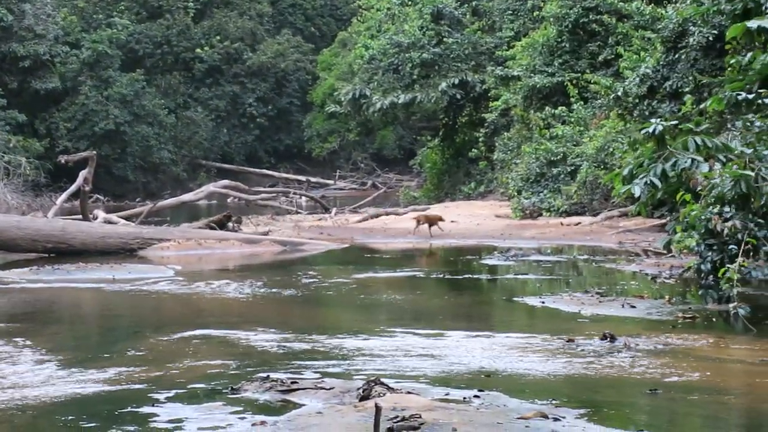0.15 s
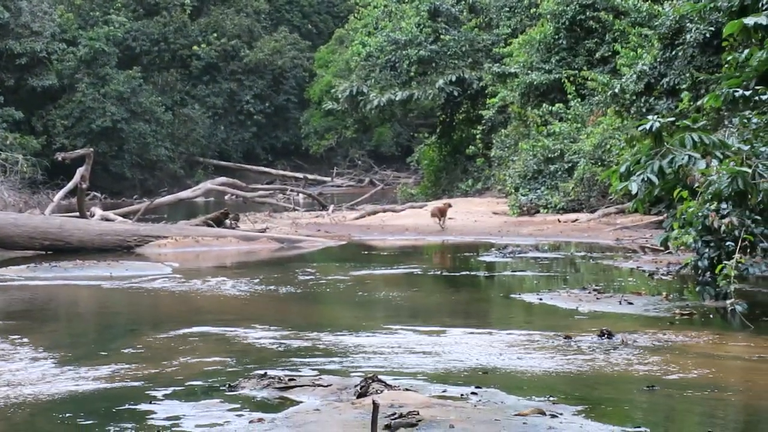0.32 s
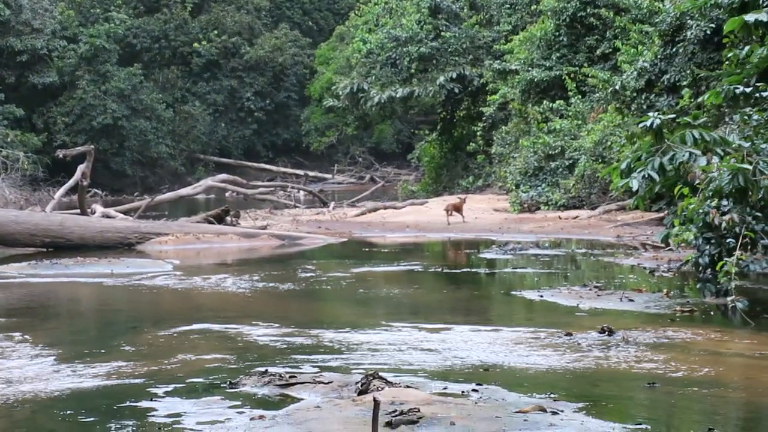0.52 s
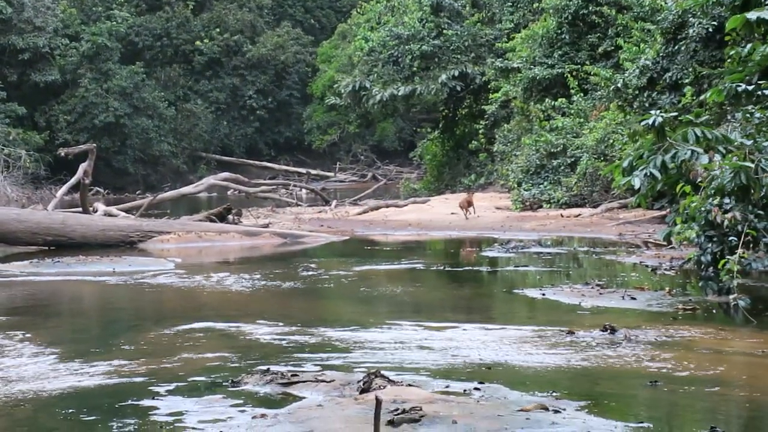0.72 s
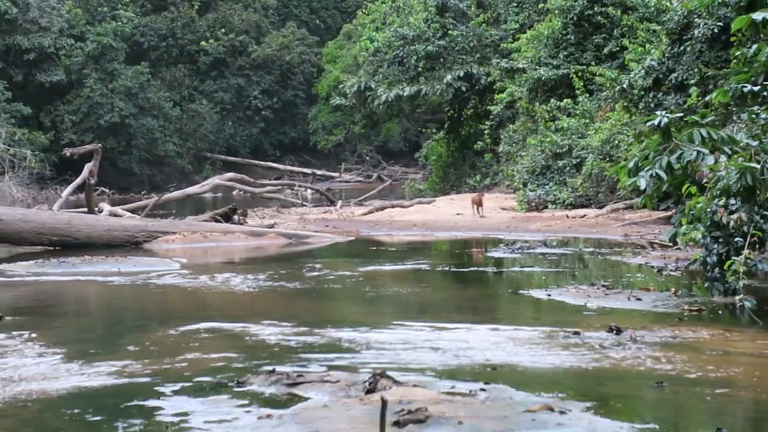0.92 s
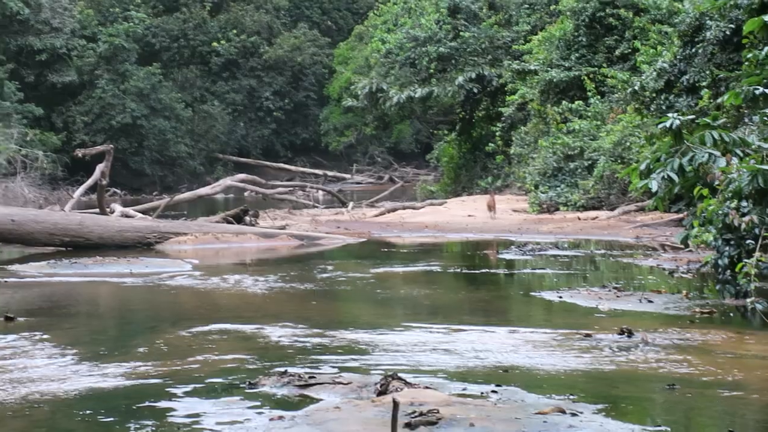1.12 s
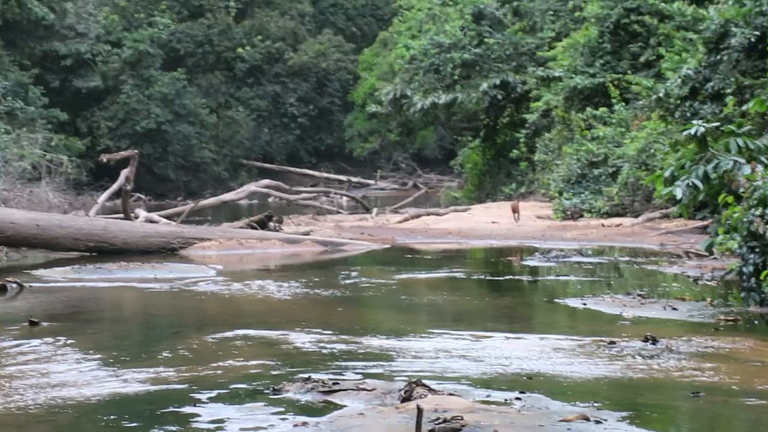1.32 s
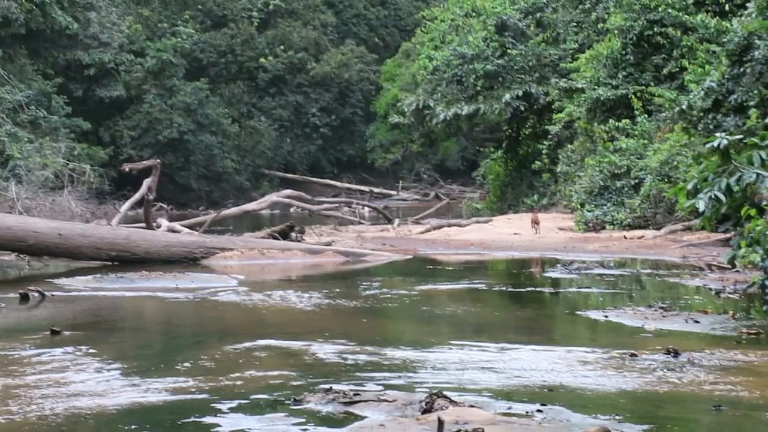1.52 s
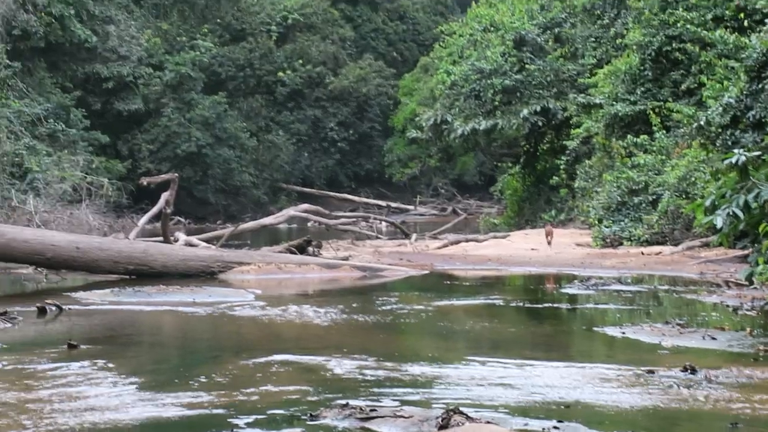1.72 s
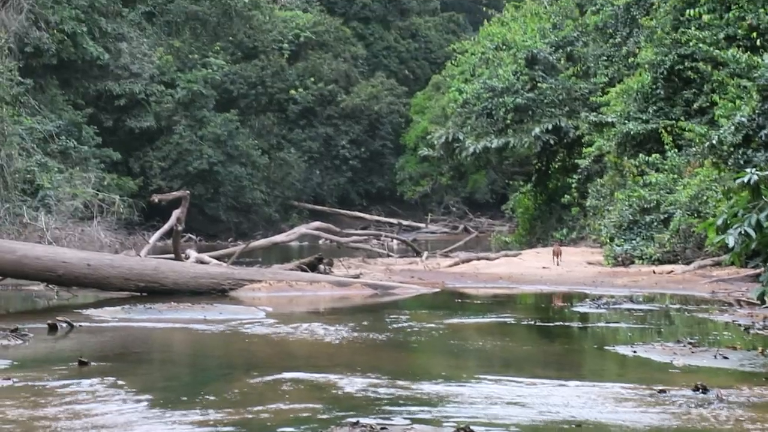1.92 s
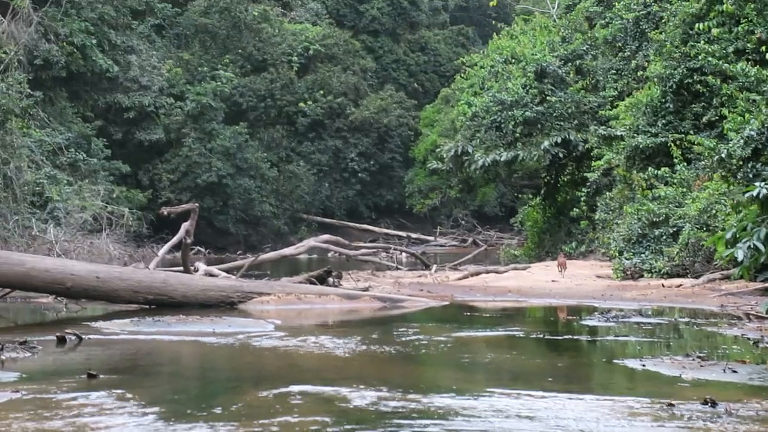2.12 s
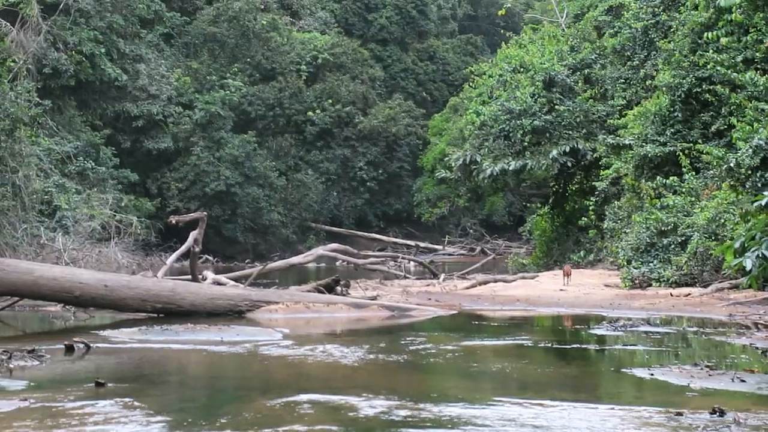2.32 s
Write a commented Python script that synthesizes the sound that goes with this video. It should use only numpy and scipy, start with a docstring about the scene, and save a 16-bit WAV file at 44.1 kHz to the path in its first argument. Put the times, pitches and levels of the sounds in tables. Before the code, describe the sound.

Shrill insect chorus above soft river murmur, with handling rub, small ticks and a loud microphone bump

```python
"""Insect choruses drone in narrow treble bands over the murmur of a quiet forest river, heard in stereo.
The insects are wandering tones; the water and the forest hiss are shaped noise, with bubbles and low hums.
Close by, two bubbles plop as rising tones, a hand rubs the casing as lumpy noise, and the casing's modes tick.
One sharp tap on the microphone, a sum of damped swings, overloads the input; the gain control
ducks the scene at once and lets it swell back."""
import sys
import numpy as np
from scipy import signal
from scipy.fft import rfft, irfft, next_fast_len
from scipy.io import wavfile
from scipy.ndimage import uniform_filter1d, map_coordinates

SR = 44100
rng = np.random.default_rng(int(sys.argv[2]) if len(sys.argv) > 2 else 0)


def int16_out(signal):
    """Quantize to a 16-bit WAV file."""
    q = np.round(np.clip(np.atleast_2d(signal).T, -1, 1) * 32767)
    wavfile.write(sys.argv[1], SR, q.astype(np.int16))


N = 105840
T = np.arange(N) / SR  # time [s]

# Insect choruses. Each row: centre in Hz, nominal width in Hz, level in dB, left-right likeness (-1 to 1),
# left over right in dB, flutter depth in dB per unit of wobble.
CHORUSES = [(7637, 670, -48.5, -0.19, 2, -1.5), (8990, 190, -60.5, -0.27, 1, -1),
            (6305, 290, -61, -0.083, 0.5, 1.5), (5830, 120, -70.5, -0.03, 0.5, 2),
            (5100, 40, -73.5, 0.2, 2.5, 3), (4455, 200, -72, 0.2, 1.5, 2.5),
            (2762, 110, -71.5, 0.032, 2.5, 1.5)]
# Swell of the first, loudest chorus. Each row: time in seconds, gain in dB.
CHORUS_SWELL = [(0, 3), (.4, 0.5), (.7, 1.5), (1.1, 2), (1.5, 1.5), (1.9, 1), (2.2, 1), (2.4, 2.5)]
# Phrases of a nearer insect. Each row: start in seconds, length in seconds, level in dB.
NEAR_PHRASES = [(-.25, 0.277, -40), (0.67, 0.43, -49.5), (1.66, 0.37, -51.5)]
PHRASE_FROM_HZ, PHRASE_TO_HZ, PHRASE_WIDTH_HZ, PHRASE_FADE_S = 7090, 7330, 90, 0.03

# Colour of the river murmur. Each row: frequency in Hz, relative density in dB per Hz.
RIVER_COLOUR = [(40, -26), (80, -11), (125, -8), (200, -6), (345, -2), (440, -5.5), (530, -2.5),
                (800, -5.5), (1050, -2), (1190, -6.5), (1400, -7), (2500, -13), (5000, -41.5)]
# Slow change of the murmur and its small bubbles. Each row: time in seconds, gain in dB.
RIVER_FLOW = [(0, -0.8), (.6, 0), (1, 0), (1.4, -1.25), (1.8, -4.5), (2.1, 0), (2.4, 0.24)]
# Colour of the forest hiss. Each row: frequency in Hz, relative density in dB per Hz.
AIR_COLOUR = [(300, -21), (1500, -4.5), (3000, -2.5), (5500, -6), (7000, -4), (9200, -4)]
# Stereo image of all the shaped noise. Each row: frequency in Hz, left-right likeness (-1 to 1).
PORT_LIKENESS = [(60, 0.49), (150, 1), (380, 0.93), (950, 0.18), (2380, 0.53), (5980, 0.021), (15000, -0.3)]
RIVER_DB, AIR_DB = -60, -59.5
LEFT_DB = 1  # river and air, left over right
# Small bubbles in the shallows: rate, median starting pitch, base level before each bubble's own size
GURGLE_PER_S, GURGLE_HZ, GURGLE_DB = 400, 494, -81
# Narrow hums in the flow. Each row: centre in Hz, nominal width in Hz, mid level in dB.
RIVER_HUMS = [(126.6, 26, -80.5), (358, 30, -74), (498, 180, -75), (1190, 47, -75)]

# Near bubbles. Each row: start in seconds, starting pitch in Hz, rise in octaves, length in seconds,
# peak level in dB.
NEAR_BUBBLES = [(-.008, 780, 1.55, .044, -52), (.042, 2300, .35, .028, -63)]

# Pressure of the hand on the casing. Each row: time in seconds, mid level in dB.
HAND_LEVEL = [(0, -59), (.08, -54), (.2, -55), (.3, -64), (.4, -56), (.48, -64), (.545, -59), (.57, -72),
              (.6, -95.5)]
# Colour of the rub. Each row: frequency in Hz, relative density in dB per Hz.
RUB_COLOUR = [(20, -7.5), (80, -5), (160, -9), (400, -21), (3000, -23), (14000, -36)]

# Ticks of the casing. Each row: start in seconds, level in dB, rattle length in seconds, top of the crunch in Hz.
CASING_TICKS = [(.124, -58, .004, 2500), (.167, -41.5, .014, 5500), (0.642, -41.5, .019, 3700),
                (.802, -41.5, .02, 3900)]
# Casing modes. Each row: frequency in Hz, relative level in dB, time to fall 60 dB in seconds.
CASING_MODES = [(330, -1, .07), (560, -4, .045), (1000, -3, .035), (1630, -2, .022), (2140, -4, .014),
                (2600, 2, .014), (3400, -5, .01)]
CONTACTS = 40  # in each rattle
CRUNCH_DB, CRUNCH_T60_S = 5, .012  # relative to the modes

# Arrival of the tap. Entries: left port, right port, both in seconds.
TAP_START_S = (.2203155, .2203285)
# Onset time constant of the tap. Entries: left port, right port, both in seconds.
TAP_ONSET_S = (.001919, .00027)
# Swings at the left port. Each row: frequency in Hz, level before onset and decay in dB,
# decay time constant in seconds, direction (1 or -1).
LEFT_SWINGS = [(870.4, 70, .000271, -1), (43.43, 70, .000533, 1), (37.93, 36.97, .002097, -1),
               (11, -1, .0125, 1)]
# Swings at the right port. Each row: frequency in Hz, level before onset and decay in dB,
# decay time constant in seconds, direction (1 or -1).
RIGHT_SWINGS = [(424.4, 35.87, .000546, 1), (279.6, 19.19, .001325, 1), (3, 45.34, .002424, -1),
                (11, .5, .0125, 1)]

SOFT_TOP_HZ = 9400  # top of everything but the tap
DUCK_ABOVE, DUCK_DB, RELEASE_DB_PER_S = .1, 12, 9  # threshold is a peak amplitude
CLIP_HARDNESS = 8
HISS_DB = -101  # electronics, before the output filter
EDGE_HZ, TOP_HZ = 20000, 16400  # gentle rounding, steep top


def amp(db):
    """Decibels to gain."""
    return 10 ** (np.asarray(db) / 20)


def unit(x):
    """Scaled to rms 1."""
    return x / np.sqrt(np.mean(np.abs(x) ** 2) + 1e-20)


def along(points, hz):
    """(Hz, value) points read along a log frequency axis."""
    f, v = np.transpose(points)
    return np.interp(np.log(hz + 1), np.log(f + 1), v)


def curve(rows):
    """(s, value) rows joined by straight lines, one value per sample."""
    return np.interp(T, *np.transpose(rows))


def wobble(rate):
    """A smooth random curve, rate knots a second (450 at most)."""
    return map_coordinates(rng.standard_normal(1200), [T * min(rate, 450)])


def filtered(x, response):
    """x shaped by a response of frequency, padded so that tails have room."""
    m = next_fast_len(N + 8192)
    return irfft(rfft(x, m) * response(np.fft.rfftfreq(m, 1 / SR)), m)[..., :N]


def balance(left_db):
    """Gains of the two ports, left over right by left_db."""
    return amp([[left_db / 2], [-left_db / 2]])


def mix_angle(alike):
    """Angle that splits two independent signals into mid and side for a given likeness."""
    return np.arccos(np.clip(alike, -1, 1)) / 2


def rush(spectrum, patchy_db):
    """Stereo noise of rms 1 with patches of random gain in time and frequency."""
    z = signal.stft(rng.standard_normal((2, N)), nperseg=512)[2]
    field = uniform_filter1d(rng.standard_normal(z.shape[1:]), size=6, axis=0)
    field = uniform_filter1d(field, size=12, axis=1)
    patchy = z * amp(patchy_db * unit(field))
    pair = signal.istft(patchy, nperseg=512)[1][:, :N]

    def colour_and_width(hz):
        angle = mix_angle(along(PORT_LIKENESS, hz))
        return amp(along(spectrum, hz)) * [np.cos(angle), np.sin(angle)]

    mid, side = filtered(pair, colour_and_width)
    return unit(np.array([mid + side, mid - side]))


def buzz(hz, width_hz, alike, left_db, flutter_db):
    """A tone whose size and phase wander, as of many unsynchronised strokes, fluttering in lumps."""
    slow = filtered(rng.standard_normal((4, N)), lambda f: 1 / (1 + (2 * f / width_hz) ** 2) ** 0.81)
    carrier = np.exp(2j * np.pi * np.cumsum(hz + 0 * T) / SR)
    a, b = ((slow[:2] + 1j * slow[2:]) * carrier).real
    angle = mix_angle(alike)
    mid, side = np.cos(angle) * a, np.sin(angle) * b
    flutter = amp(flutter_db * (wobble(180) + 0.2 * wobble(25) + 0.35 * wobble(11.0)))
    return unit(np.array([mid + side, mid - side]) * flutter) * balance(left_db)


def insects():
    """Unsynchronised wing strokes: steady choruses, the loudest swelling, and a nearer rising singer."""
    bands = [amp(db) * buzz(hz, width, alike, left, flutter)
             for hz, width, db, alike, left, flutter in CHORUSES]
    out = bands[0] * amp(curve(CHORUS_SWELL)) + sum(bands[1:])
    for start, length, db in NEAR_PHRASES:
        done = np.clip((T - start) / length, 0, 1)
        nearest_end_s = np.minimum(T - start, start + length - T)
        gate = np.clip(nearest_end_s / PHRASE_FADE_S, 0, 1)
        # the pitch rises fast at first, then slower
        hz = PHRASE_FROM_HZ + (PHRASE_TO_HZ - PHRASE_FROM_HZ) * np.sqrt(done)
        out = out + amp(db) * gate * buzz(hz, PHRASE_WIDTH_HZ, 0, 0, 0.49)
    return out


def gurgle():
    """Small bubbles in the shallows, each a short tone that rises as it dies away."""
    draw, spread = rng.random((1200, 2)), rng.standard_normal(1200)
    start, t = draw[:, :1] * 1200 / GURGLE_PER_S, np.arange(1500) / SR
    hz = GURGLE_HZ * np.exp(.5 * spread)[:, None]
    cycles = hz * t
    size = amp(GURGLE_DB - 1.6 * np.log(draw[:, 1:] + .01))  # a few bubbles are louder
    tone = np.sin(2 * np.pi * cycles * (1 + 0.029 * cycles))
    grains = size * tone * cycles * np.exp(-cycles / 2.5)
    where = (start * SR).astype(int) + np.arange(len(t))
    return np.bincount(where.ravel(), grains.ravel(), minlength=N)[:N]


def river():
    """Patchy noise for the murmur, with bubbles in it, and the more even hiss of the forest."""
    murmur = amp(RIVER_DB + 0.2 * wobble(6.81)) * rush(RIVER_COLOUR, patchy_db=2.0)
    air = amp(AIR_DB) * rush(AIR_COLOUR, patchy_db=1.3)
    water = amp(curve(RIVER_FLOW)) * (murmur + gurgle())
    return (water + air) * balance(LEFT_DB)


def hums():
    """Wavering narrow tones in the murmur, slowly changing in level."""
    return sum(amp(db + 2.5 * wobble(3)) * buzz(hz, width, .8, 1, 2) for hz, width, db in RIVER_HUMS)


def plop():
    """Closing air pockets: pitch rises ever faster while the tone swells and fades."""
    out = np.zeros(N)
    for start, low_hz, octaves, length, db in NEAR_BUBBLES:
        done = np.clip((T - start) / length, 0, 1)
        hz = low_hz * 2 ** (octaves * done ** 2)
        swell = np.sin(np.pi * done ** .6)
        out += amp(db) * swell * np.sin(2 * np.pi * np.cumsum(hz) / SR)
    return out


def hand():
    """Low lumpy rub of fingers on the casing: patchy noise with an unsteady level."""
    return amp(curve(HAND_LEVEL) + 1.2 * wobble(33)) * rush(RUB_COLOUR, patchy_db=4.0)


def rattled(ring, length_s):
    """A ring struck by a scatter of contacts, with the energy of one blow."""
    rattle, late = np.zeros((1, ring.shape[1])), rng.random(CONTACTS)
    force = rng.standard_normal(CONTACTS) * np.sin(np.pi * late ** .5)
    rattle[0, (late * length_s * SR).astype(int)] = force
    hit = signal.fftconvolve(ring, rattle, axes=1)[:, :ring.shape[1]]
    return hit * np.linalg.norm(ring) / np.linalg.norm(hit)


def ticks():
    """Each tick is a short rattle of contacts that crunch and ring every casing mode."""
    out, t = np.zeros((2, N + SR)), np.arange(SR // 8) / SR
    for start, db, length, top_hz in CASING_TICKS:
        phases = rng.standard_normal((len(CASING_MODES), 2, 1))
        ring = 0
        for (hz, level, t60), phase in zip(CASING_MODES, phases):
            # higher modes reach the two ports with more scattered phase
            tone = np.sin(2 * np.pi * hz * t + np.clip(hz / 2500, 0, 2) * phase)
            ring = ring + rattled(amp(level - 60 * t / t60) * tone, length)
        noise = filtered(rng.standard_normal((2, N)), lambda f: 1 / (1 + (f / top_hz) ** 6))
        grit = unit(noise[:, :len(t)])
        crunch = rattled(amp(CRUNCH_DB - 60 * t / CRUNCH_T60_S) * grit, length)
        out[:, round(start * SR):][:, :len(t)] += amp(db) * (ring + crunch)
    # the bass is cut below 170 Hz
    return filtered(out[:, :N], lambda f: (1j * f / (170 + 1j * f)) ** 4) * balance(1.6)


def tap_at_port(start, rise, swings):
    """A snap, a flex and slow swings back: damped sines behind a smooth onset."""
    t = np.maximum(T - start, 0)
    swing = sum(way * amp(db) * np.exp(-t / decay) * np.sin(2 * np.pi * hz * t)
                for hz, db, decay, way in swings)
    return (1 - np.exp(-t / rise)) ** 2 * swing


def tap():
    """One blow on the microphone; the snap pushes the two ports opposite ways."""
    ports = zip(TAP_START_S, TAP_ONSET_S, (LEFT_SWINGS, RIGHT_SWINGS))
    return np.array([tap_at_port(*port) for port in ports])


def scene():
    """Everything that reaches the two ports; the treble top is cut from all but the tap."""
    soft = insects() + river() + hums() + plop() + hand() + ticks()
    return filtered(soft, lambda f: 1 / (1 + (f / SOFT_TOP_HZ) ** 120)) + tap()


def record(dry):
    """A loud peak ducks the gain at once, it climbs back steadily; peaks clip; the treble rounds off."""
    wanted_db = np.where(np.abs(dry).max(axis=0) > DUCK_ABOVE, -DUCK_DB, 0)
    climb_db = RELEASE_DB_PER_S * T
    # the lowest gain so far, released at a constant rate
    gain_db = np.minimum.accumulate(wanted_db - climb_db) + climb_db
    x = dry * amp(gain_db)
    x = x / (1 + np.abs(x) ** CLIP_HARDNESS) ** (1 / CLIP_HARDNESS)
    x = x + amp(HISS_DB) * rng.standard_normal((2, N))
    return filtered(x, lambda f: 1 / (1 + 1j * f / EDGE_HZ) ** 2 / (1 + (f / TOP_HZ) ** 40))


dry = scene()
out = record(dry)
int16_out(out)
```